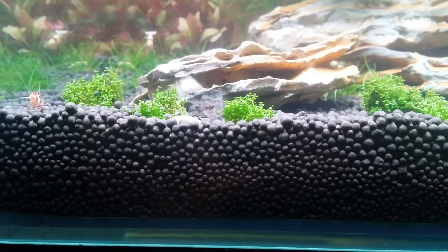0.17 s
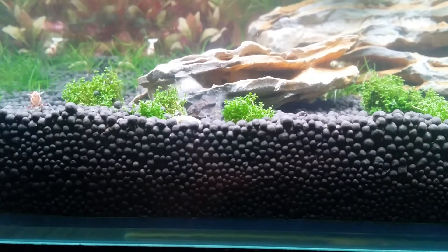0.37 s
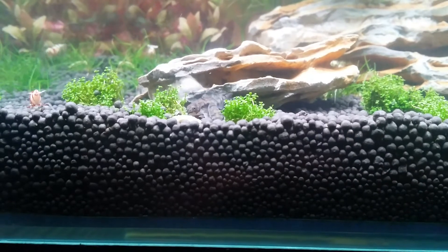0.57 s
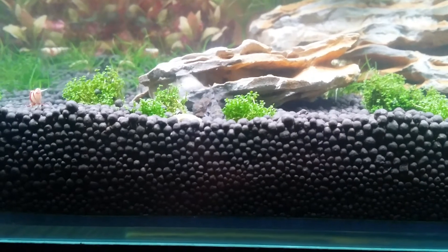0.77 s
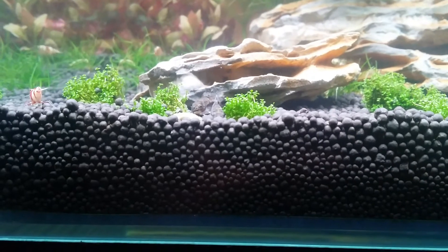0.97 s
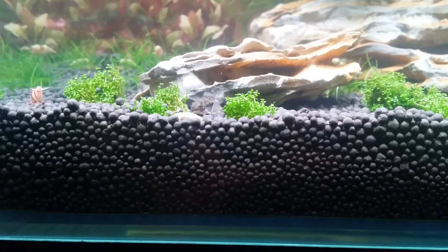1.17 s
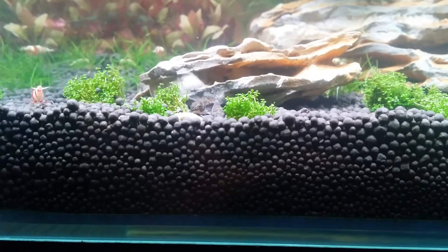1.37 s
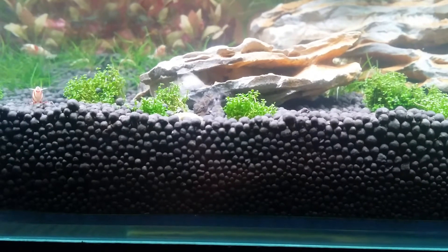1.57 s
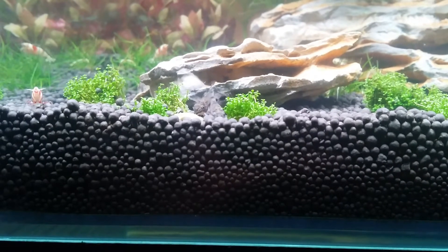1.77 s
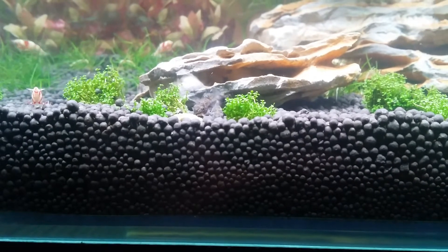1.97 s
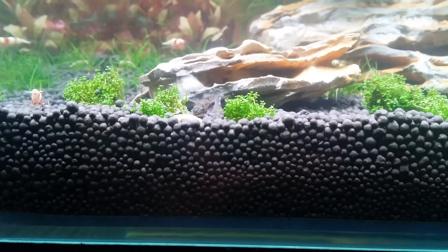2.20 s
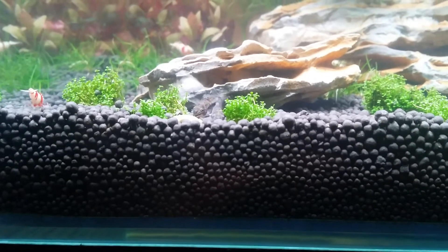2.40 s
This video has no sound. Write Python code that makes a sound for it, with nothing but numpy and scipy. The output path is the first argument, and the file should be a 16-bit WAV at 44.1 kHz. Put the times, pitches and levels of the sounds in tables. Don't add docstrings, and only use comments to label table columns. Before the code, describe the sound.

Steady electric drone of fish tank equipment, deep and smooth, swelling and dipping slightly throughout; quiet indoor room tone beneath, thin bearing whistle and airy hiss above, picked up by a small two-port microphone.

```python
import sys
import numpy as np
from scipy import signal
from scipy.fft import rfft, irfft
from scipy.io import wavfile

SR = 44100
rng = np.random.default_rng(int(sys.argv[2]) if len(sys.argv) > 2 else 0)


def pcm_store(signal):
    levels = np.round(np.clip(np.atleast_2d(signal), -1, 1) * 32767)
    wavfile.write(sys.argv[1], SR, levels.astype(np.int16).T)


def gain_from_db(level_db):
    decades = np.asarray(level_db, float) / 20
    return 10 ** decades


N = 112014
TIME = np.arange(N) / SR
BINS_HZ = np.maximum(np.arange(N // 2 + 1) * SR / N, 1)


def at_hz(points, column=1):
    points = np.array(points)
    return np.interp(np.log(BINS_HZ), np.log(points[:, 0]), points[:, column])


def noise(db_per_hz):
    white = rfft(rng.standard_normal(N))
    return irfft(white * gain_from_db(db_per_hz) * np.sqrt(SR / 2), N)


def drift(rate_hz):
    white = rfft(rng.standard_normal(N))
    slow = irfft(white * (BINS_HZ > 1) / (1 + (BINS_HZ / rate_hz) ** 2), N)
    return slow / slow.std()


def resonance(hz, width_hz):
    return 1 / (1 + (2 * (BINS_HZ - hz) / width_hz) ** 2)


def orders(table, angle):
    sides = np.array([[.5], [-.5]])
    out = 0
    for multiple, db, pan_db, lead in table:
        level = np.sqrt(2) * gain_from_db(db + pan_db * sides)
        out = out + level * np.cos(round(multiple) * angle + lead * sides)
    return out


# (multiple of rotor speed, level [dB], left-right [dB], left lead [rad])
PUMP_HUM = [(2, -59, 0.4, 0.37), (5, -67.5, -1.5, -0.21), (6, -79.5, -6, 1), (7, -78, -4.5, -0.36),
            (8, -76.5, -6, 0.26), (10, -77.5, 7.5, 0.69), (11, -60.5, -0.2, 0.78), (12, -77.5, 10.5, -.6),
            (14, -114.5, -3, .4), (15, -100.5, -2, -1.2)]
# (multiple of rotor speed, level [dB], left-right [dB], left lead [rad])
PUMP_WHINE = [(24, -95, 2.1, 2.5), (25, -89.5, 3, -2.1), (29, -96, -9, -2.1), (30, -85.5, -9, 1.9),
              (31, -87, .1, -1.8), (32, -92.5, 7, .2), (33, -97, 11, -1.9), (82, -97, 5, -.9),
              (36, -96, 3, 1.8), (37, -88.5, -.9, 2.2), (49, -90, 2.1, -2.1), (50, -95, -6, .9),
              (55, -98, -18, 2.8), (73, -90.5, -3, -3.1)]
# (multiple of buzz pitch, level [dB], left-right [dB], left lead [rad])
MAINS_BUZZ = [(1, -66.5, 1.2, 0.33), (2, -77.5, -9, 0.16)]


def pump():
    rotor_hz, buzz_hz, beat_peak_s = 49.213, 99.83, .109
    since_peak = TIME - beat_peak_s
    rotor = 2 * np.pi * rotor_hz * since_peak
    hum = orders(PUMP_HUM, rotor)
    whine = orders(PUMP_WHINE, rotor + rng.uniform(0, 6))
    buzz = orders(MAINS_BUZZ, 2 * np.pi * buzz_hz * since_peak)
    return hum + whine + buzz


# (multiple of fan pitch, level [dB], left-right [dB], left lead [rad])
FAN_DRONE = [(1, -52, -1.9, 0.072), (2, -92, 5.5, 0.29), (16, -86, -10.5, 0.83)]
# (time [s], level [dB])
FAN_SWELL = [(0, -3.5), (.1, 0.5), (.3, 0.4), (.36, -3.5), (.44, 1.5), (.52, -0.5), (.72, -2.5), (.88, 1.8),
             (.96, -2), (1.15, 2.5), (1.27, -1.3), (1.45, 1), (1.7, 1.5), (1.8, -0.2), (2.05, 0.5),
             (2.26, -2.1), (2.38, 0), (2.54, -1.1)]


def fan():
    fan_hz, wander_s = 166.87, .00008
    swell = gain_from_db(np.interp(TIME, *np.transpose(FAN_SWELL)))
    angle = 2 * np.pi * fan_hz * (TIME + wander_s * drift(2.6))
    return swell * orders(FAN_DRONE, angle)


WHISTLE_HZ = [2715, 3661, 3709, 4203, 4480, 4752, 5700, 5587, 5639, 5733, 6090, 6790, 7430, 8465]
# (width [Hz], level [dB], left-right [dB])
WHISTLES = [(10.5, -90, -8), (8.9, -91.5, -15), (8, -92, -8), (4.7, -91, -6), (59.6, -86, -3),
            (12.1, -89.5, 4), (250, -83.5, -2), (10.6, -93, -3), (10.4, -93, -14), (10.5, -91.5, -10),
            (140, -85, -9), (150, -91, -2), (248, -89, -1), (6, -94, -9)]


def bearing_whistles():
    out = 0
    for hz, (width_hz, db, pan_db) in zip(WHISTLE_HZ, WHISTLES):
        db_per_hz = db + 20 * np.log10(resonance(hz, width_hz)) - 10 * np.log10(width_hz)
        out = out + noise(db_per_hz) * gain_from_db([[pan_db / 2], [-pan_db / 2]])
    return out


# (frequency [Hz], level [dB per Hz])
RUMBLE = [(20, -103), (55, -102), (110, -88.5), (210, -83), (350, -90), (550, -95), (750, -101),
          (1400, -112)]
# (frequency [Hz], width [Hz], boost, or cut if negative [dB])
ROOM_RESPONSE = [(70, 4.6, 10.5), (128.3, 8.7, 5.5), (161, 21, 11), (226.6, 7.9, 4), (920, 83, 2.5),
                 (274, 14, 7.5), (547, 36, 3), (148, 7.1, -7.5), (191, 14, -2.5), (196, 8.9, 1),
                 (262, 9, -2.5), (363, 27, -2.5), (444, 86, 2.5), (475, 16, -1.5)]
# (frequency [Hz], likeness [0-1], left-right [dB])
RUMBLE_STEREO = [(25, 0.4, 0), (59, 1, -2), (128, 0.98, 0), (280, 0.89, -2), (616, 0.28, -2), (1320, 0, 1)]


def room_rumble():
    octaves_above = np.log2(np.maximum(BINS_HZ / RUMBLE[-1][0], 1))
    colour = at_hz(RUMBLE) - 18 * octaves_above
    for hz, width_hz, boost_db in ROOM_RESPONSE:
        colour = colour + boost_db * resonance(hz, width_hz)
    alike = np.clip(at_hz(RUMBLE_STEREO), 0, .999)
    pan_db = at_hz(RUMBLE_STEREO, column=2)
    shared = rfft(noise(colour)) * np.sqrt((1 + alike) / 2)
    opposed = rfft(noise(colour)) * np.sqrt((1 - alike) / 2)
    left = (shared + opposed) * gain_from_db(pan_db / 2)
    right = (shared - opposed) * gain_from_db(-pan_db / 2)
    return irfft(np.array([left, right]), N)


# (frequency [Hz], level [dB per Hz])
HISS_LEFT = [(100, -104), (1000, -106), (3000, -108), (5000, -104), (7000, -94), (9000, -100),
             (11500, -110), (14500, -110)]
# (frequency [Hz], level [dB per Hz])
HISS_RIGHT = [(100, -104), (1000, -105), (2000, -107), (3000, -108), (5000, -108), (8000, -110),
              (10500, -112), (14500, -110)]


def microphone_hiss():
    cavity_db = 2.5 * resonance(6840, 710)
    hiss = np.array([noise(at_hz(HISS_LEFT) + cavity_db), noise(at_hz(HISS_RIGHT))])
    top_roll = signal.butter(8, 14480, fs=SR, output="sos")
    return signal.sosfilt(top_roll, hiss)


# (time [s], level [dB])
GAIN = [(0, -0.4), (.13, 0.4), (.3, -0.6), (.45, 0.3), (.6, -.3), (.75, -1.4), (.9, -0.1), (1.05, -0.2),
        (1.15, 0.2), (1.27, -0.45), (1.45, 0.8), (1.6, 0.7), (1.75, 0.5), (1.85, -0.7), (2.05, -0.8),
        (2.15, -0.4), (2.3, -0.66), (2.54, -1)]


def automatic_gain():
    flutter_db, flutter_hz = 0.38, 9
    gain_db = np.interp(TIME, *np.transpose(GAIN)) + flutter_db * drift(flutter_hz)
    return gain_from_db(gain_db)


def scene():
    return pump() + fan() + bearing_whistles() + room_rumble()


def band_limit(x):
    return signal.sosfilt(signal.butter(12, 14540, fs=SR, output="sos"), x)


def record(dry):
    offset = -.0003
    mix = (dry + microphone_hiss()) * automatic_gain() + offset
    return band_limit(mix)


dry = scene()
out = record(dry)
pcm_store(out)
```